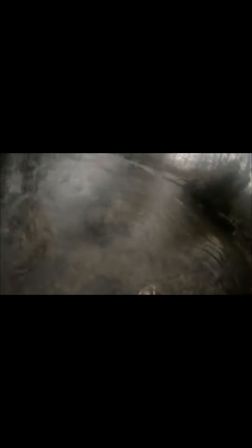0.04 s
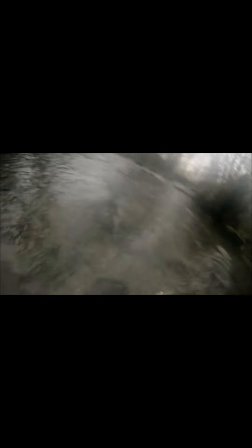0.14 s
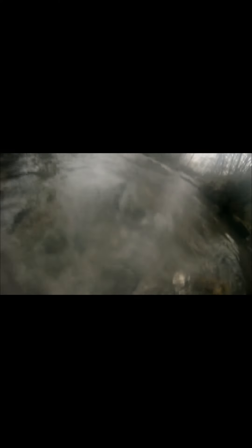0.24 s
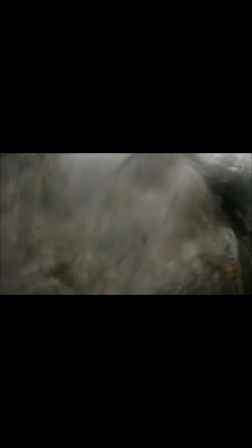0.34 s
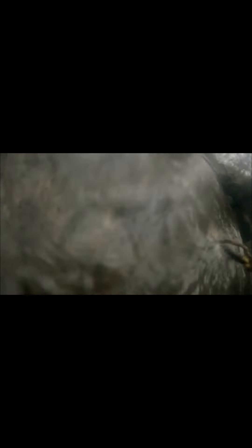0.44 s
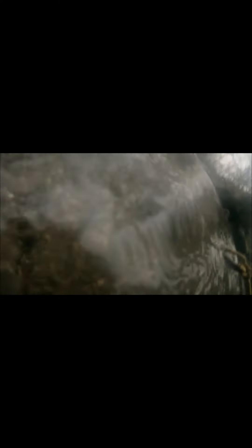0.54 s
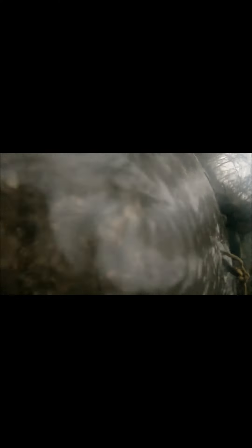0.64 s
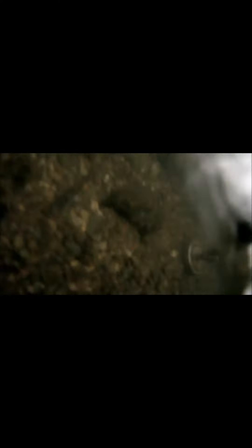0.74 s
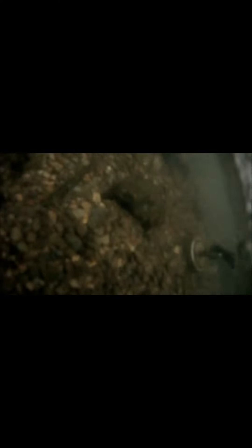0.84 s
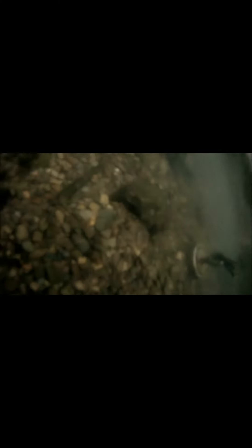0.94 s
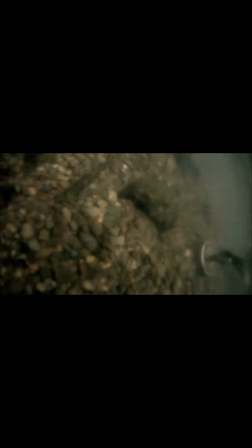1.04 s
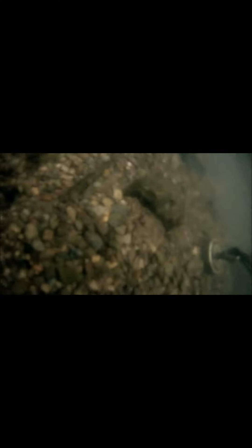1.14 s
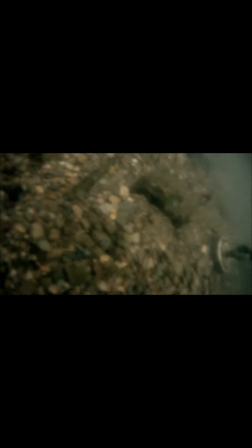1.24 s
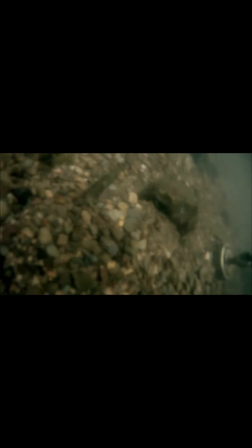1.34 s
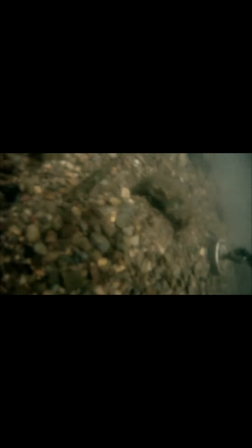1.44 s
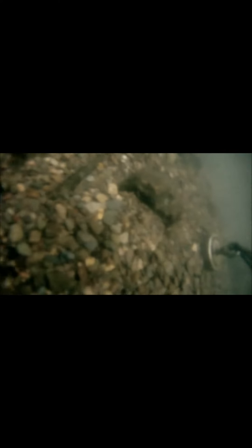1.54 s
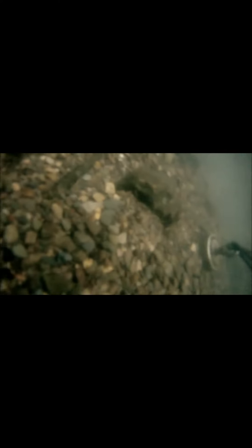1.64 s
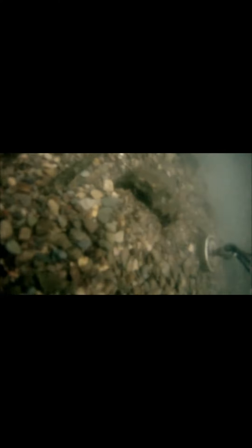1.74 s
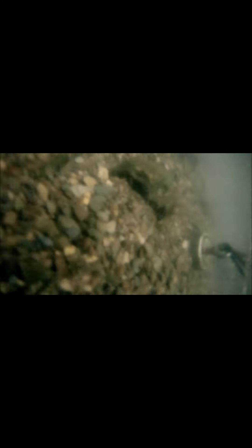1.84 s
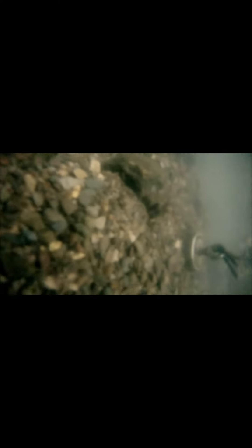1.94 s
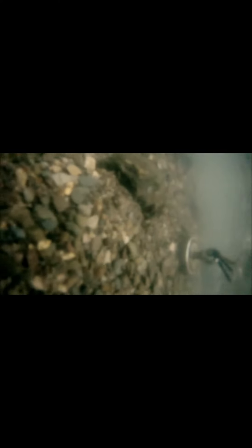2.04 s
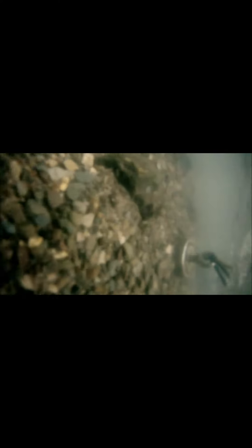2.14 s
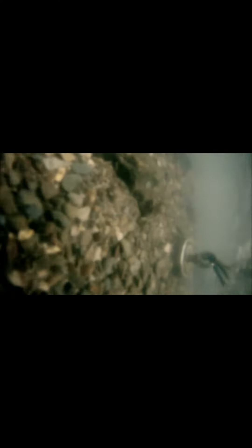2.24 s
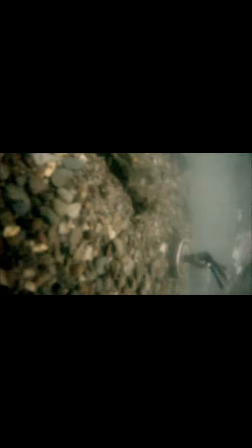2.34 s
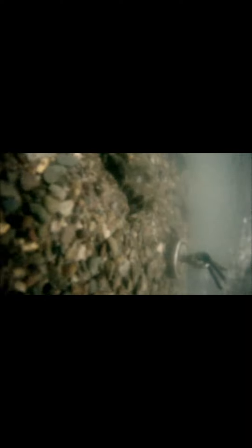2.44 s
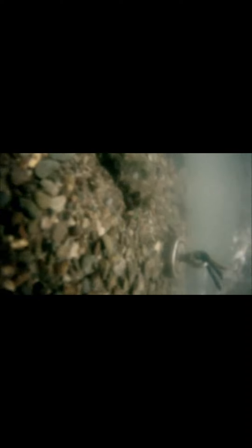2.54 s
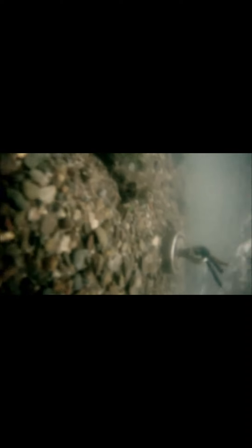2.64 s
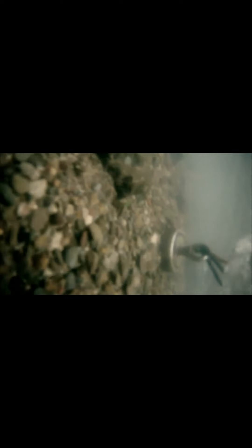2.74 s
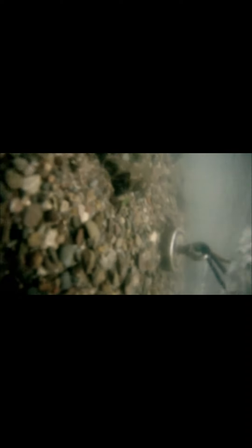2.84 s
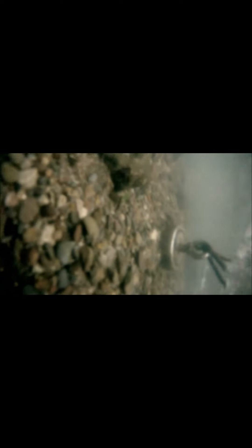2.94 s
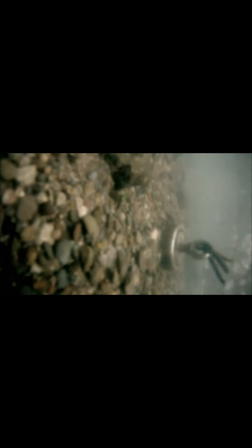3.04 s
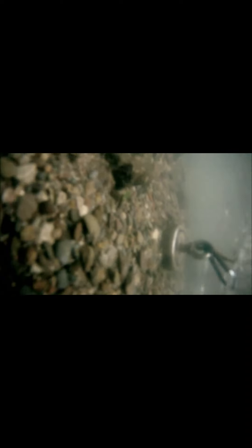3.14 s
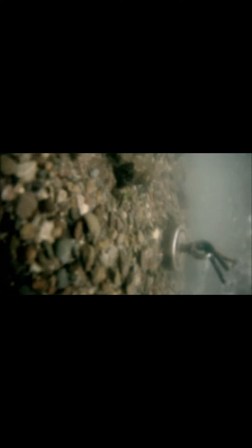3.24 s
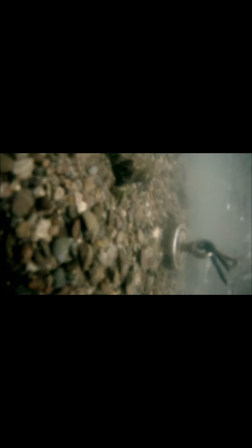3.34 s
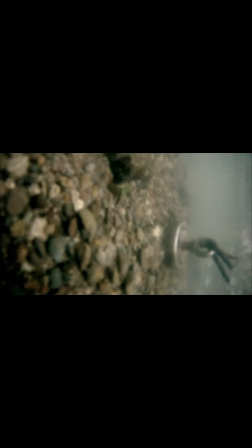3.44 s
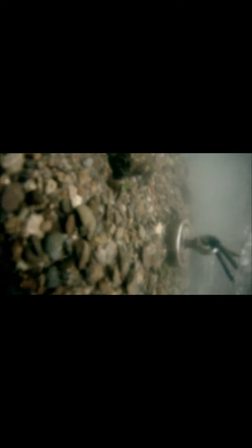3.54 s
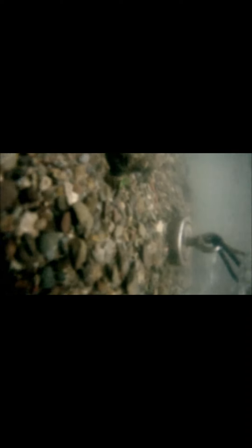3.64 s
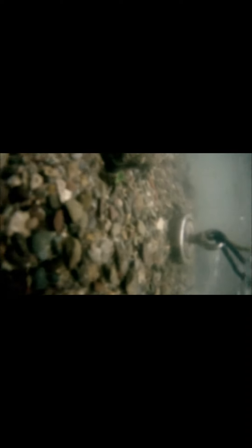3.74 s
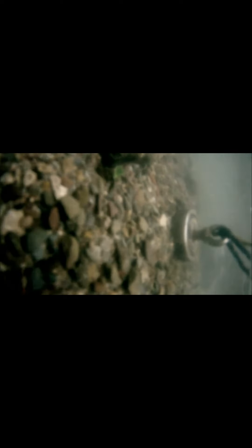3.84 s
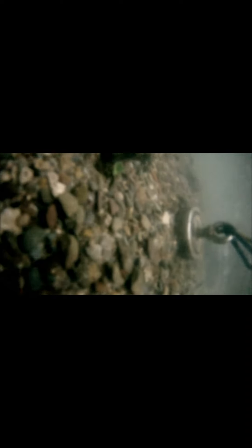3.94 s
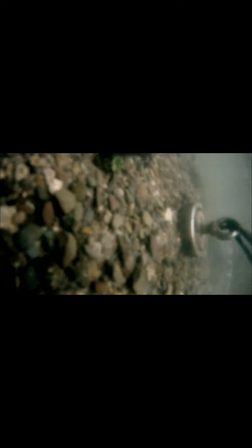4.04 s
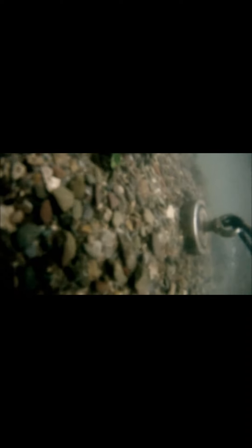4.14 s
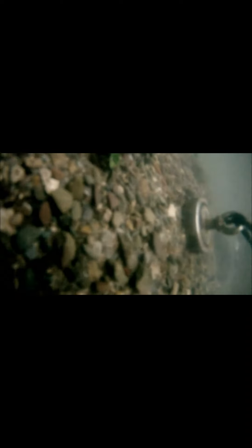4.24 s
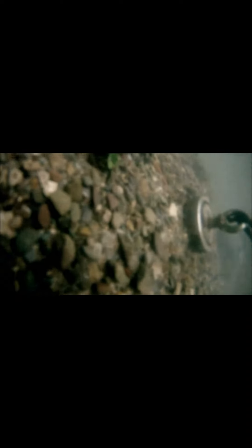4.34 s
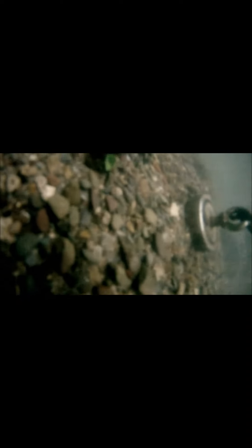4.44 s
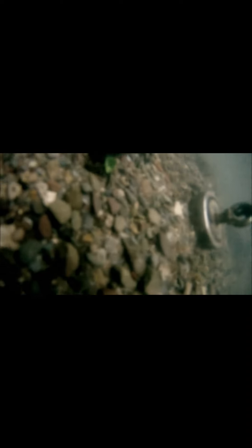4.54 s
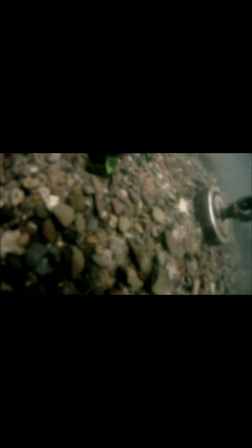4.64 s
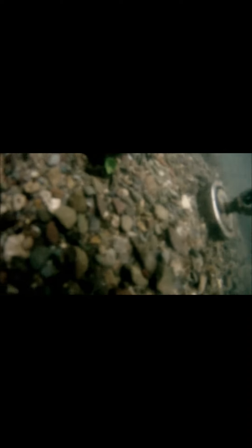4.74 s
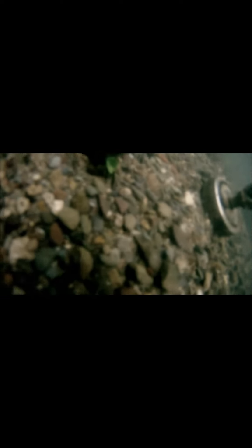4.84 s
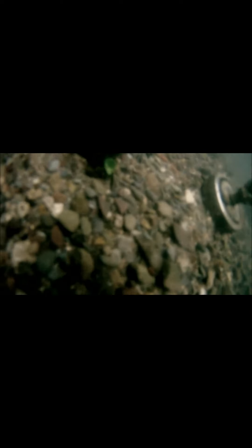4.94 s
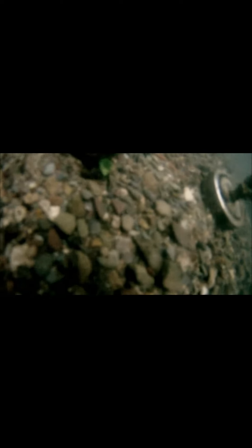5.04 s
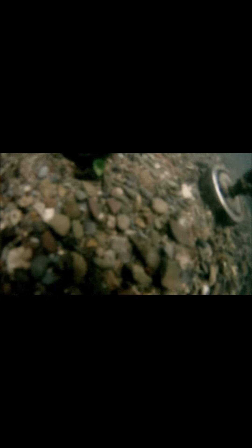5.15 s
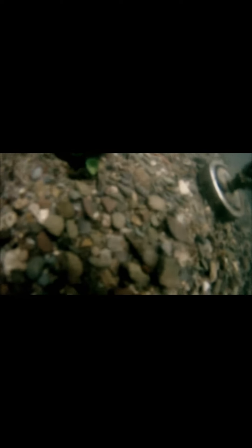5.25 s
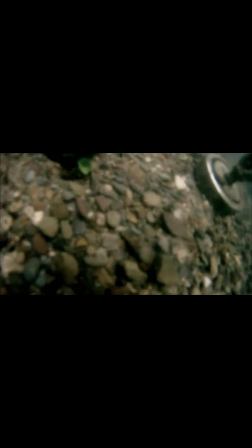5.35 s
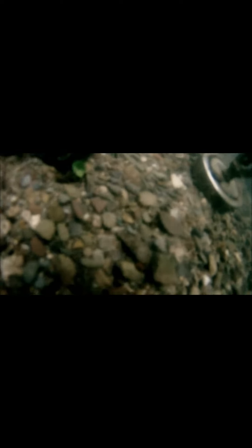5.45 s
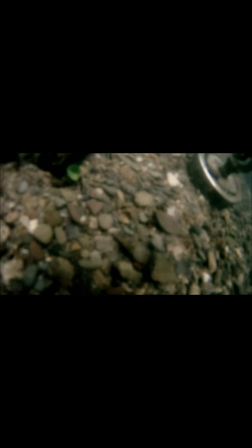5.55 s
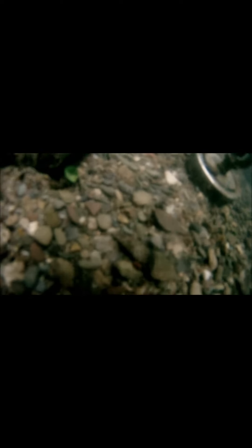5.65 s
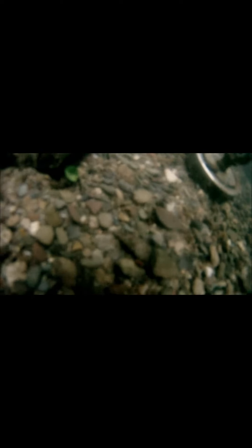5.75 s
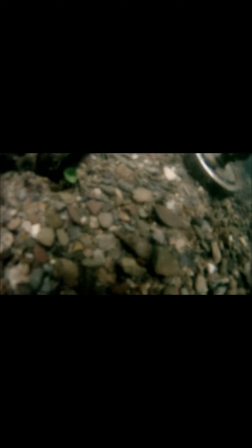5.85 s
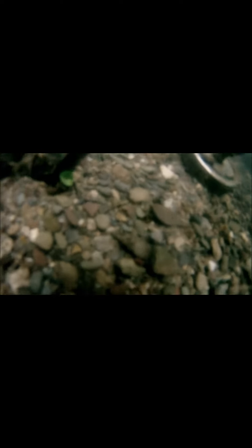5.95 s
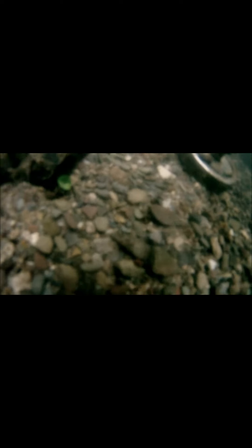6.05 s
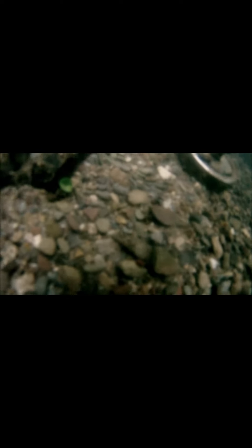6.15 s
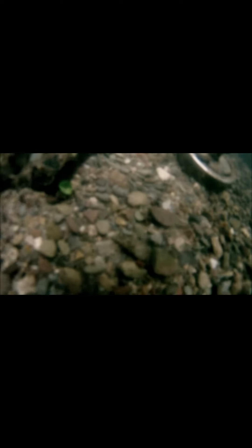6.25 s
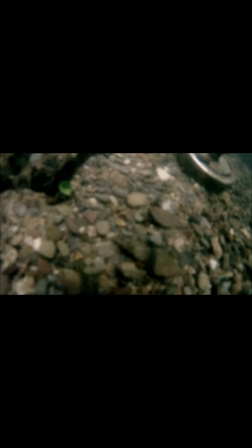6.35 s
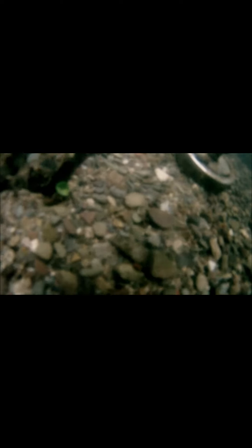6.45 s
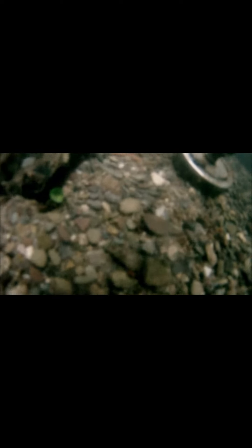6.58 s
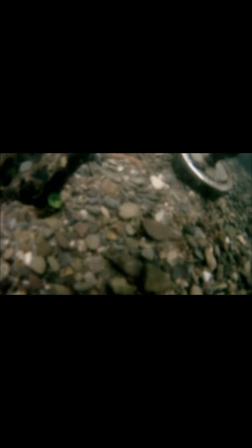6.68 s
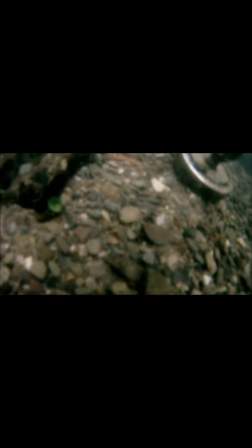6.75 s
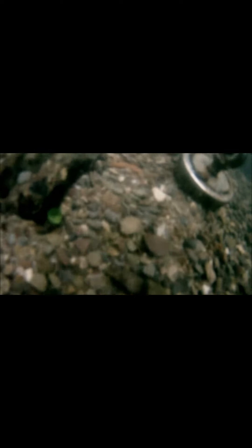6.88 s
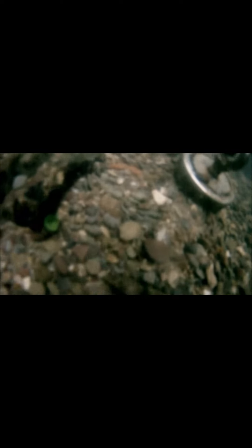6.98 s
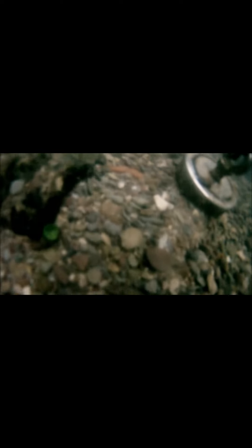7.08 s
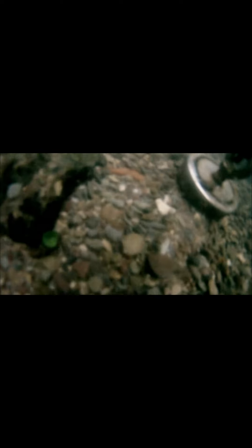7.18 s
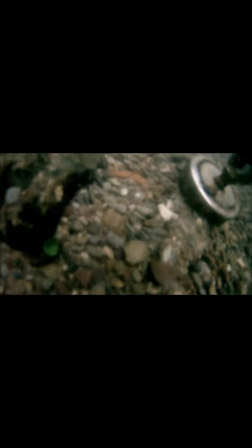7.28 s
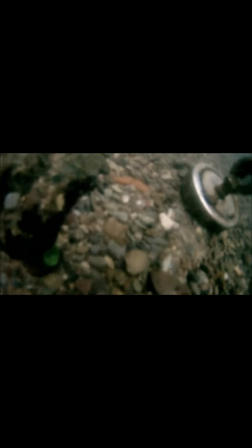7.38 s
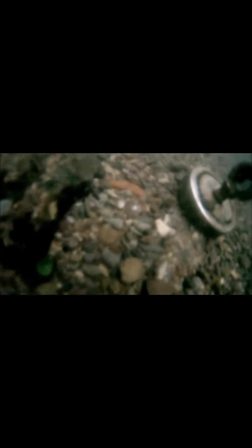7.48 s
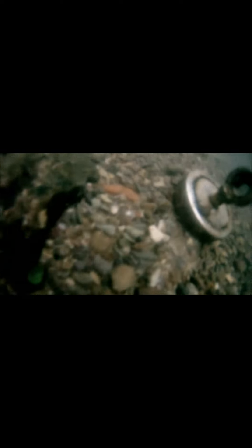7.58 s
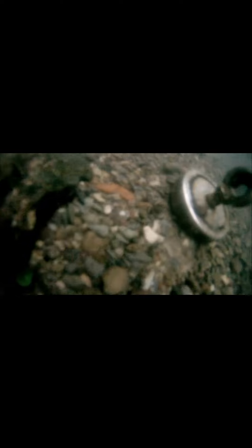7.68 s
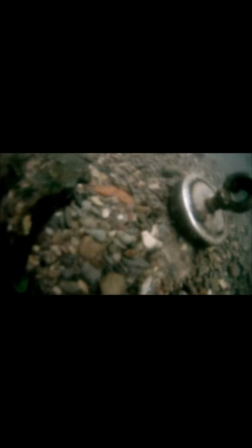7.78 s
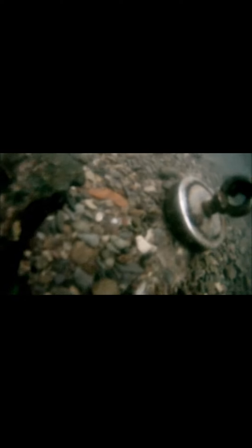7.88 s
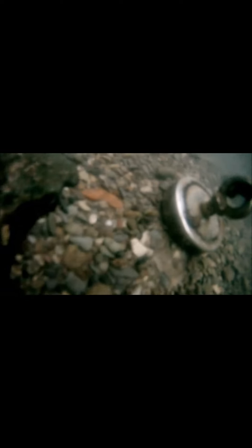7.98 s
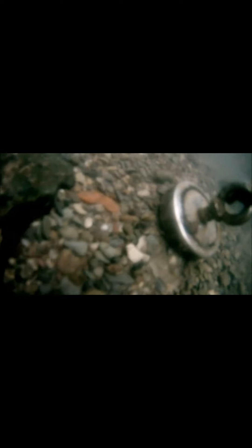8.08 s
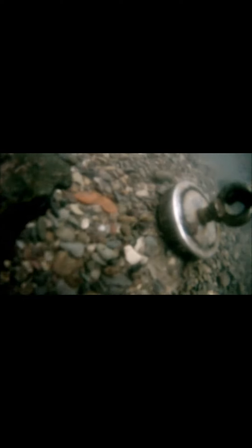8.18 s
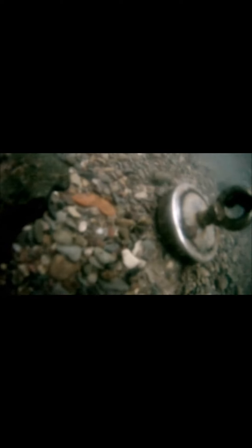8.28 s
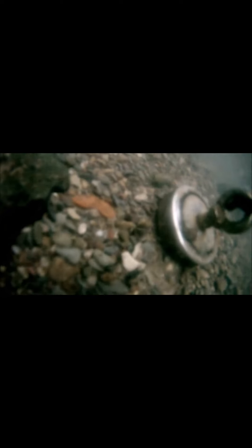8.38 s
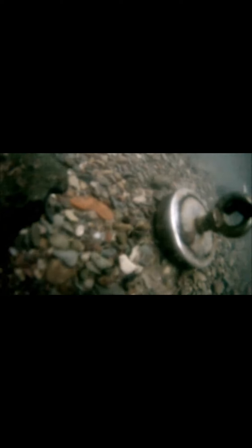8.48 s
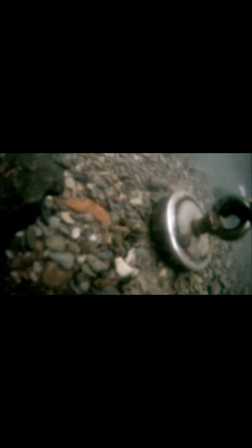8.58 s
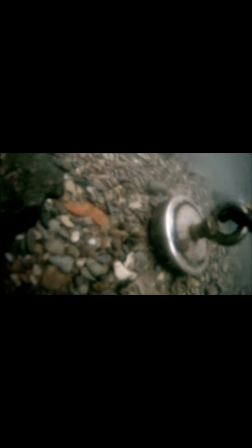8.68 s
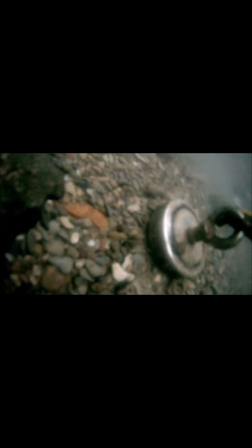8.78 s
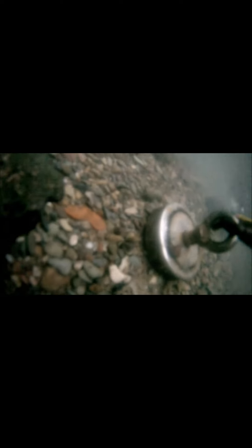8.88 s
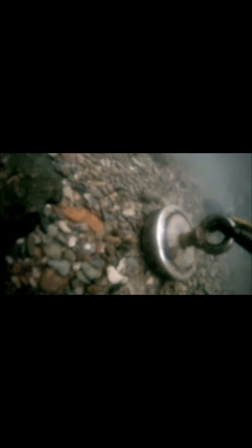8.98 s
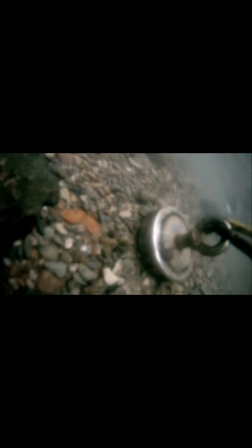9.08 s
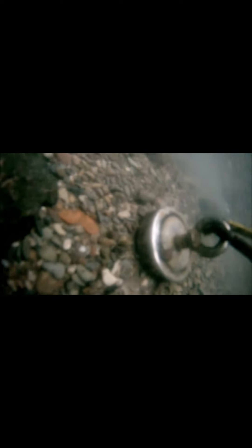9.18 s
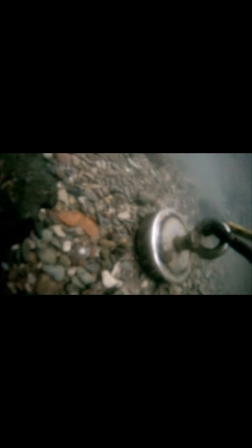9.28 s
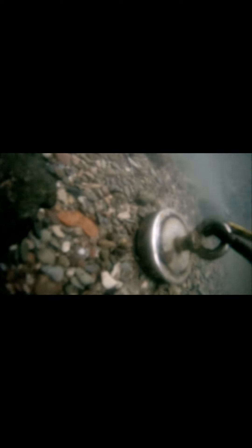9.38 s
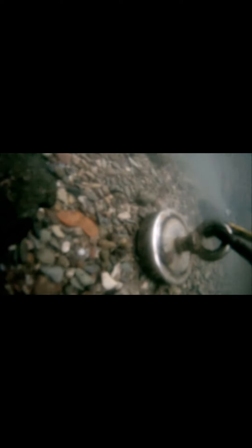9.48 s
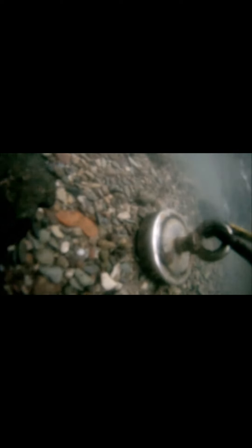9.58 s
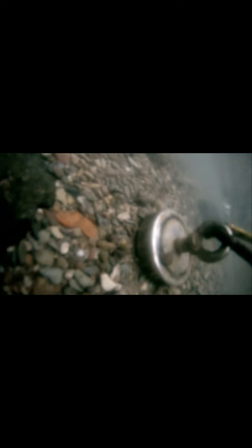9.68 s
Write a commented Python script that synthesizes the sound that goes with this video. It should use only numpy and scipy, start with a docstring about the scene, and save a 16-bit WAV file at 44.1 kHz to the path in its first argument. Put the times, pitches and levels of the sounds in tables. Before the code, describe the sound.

Heard from inside a sealed case: turbulent splashing and hollow plastic-like knocks, the hardest overloading, as it enters stream water over gravel. Bubbles pop and ring brightly with sagging pitch. The rush thins into dull underwater hush with a thin string of blips, then a brief, weak surge with one clear bubble near five seconds. Sparse pebble or magnet ticks and faint bubbles continue over a low rumble.

```python
"""Water rushes and slaps against a waterproof case, with a camera in it, as it dips into a shallow stream.
Magnet and pebbles click on it as hollow, decaying modes; then it is held under, over the gravel.
Bubbles ring as sagging sines, grit ticks, and filtered noise makes the rush, rumble, boom and far wash.
One microphone hears all of it through the case; a low sample rate, held, adds a glassy top."""
import sys
import numpy as np
from scipy import signal
from scipy.fft import rfft, irfft, next_fast_len
from scipy.io import wavfile
from scipy.ndimage import uniform_filter1d

SR = 44100
rng = np.random.default_rng(int(sys.argv[2]) if len(sys.argv) > 2 else 0)


def int16_out(signal):
    """Quantize to a 16-bit WAV file."""
    q = np.round(np.clip(np.atleast_2d(signal).T, -1, 1) * 32767)
    wavfile.write(sys.argv[1], SR, q.astype(np.int16))


N = 428652  # length in samples

# how deep the case sits; deeper water loads its walls more: start_s, depth (0-1)
DEPTH = [(0, 0), (1.5, .1), (2.4, .3), (4.9, .8), (6.3, .85), (7.2, 1)]

# spectrum of the far stream: freq_hz, density_db
STREAM_COLOUR = [(150, -38.5), (250, -7), (264, -5.5), (440, -6.5), (543, -9.5), (932, -6.5), (1090, -13.5),
                 (1210, -7), (1540, -7), (2220, -2), (2930, -15), (3340, -9), (3860, -16.5), (5090, -17.5),
                 (5800, -20.5), (7540, -57), (12800, -120)]

# spectrum of the deep rumble: freq_hz, density_db
RUMBLE_COLOUR = [(8.8, -30), (15, -1), (27, -1.5), (40, -2.5), (52, -4.5), (76, -11.5), (136, -15.5),
                 (220, -25.5), (290, -57.5), (480, -120)]
# rumble of the current between surges, before its gain and eddies: start_s, level_db
RUMBLE_LEVEL = [(0, -45.5), (0.5, -46.5), (1.05, -50), (1.35, -50.5), (1.5, -59), (1.9, -53), (2.1, -58.5),
                (2.7, -56), (3.3, -58), (4.0, -56), (4.5, -56.5), (4.8, -60), (6.3, -58.5), (6.7, -64),
                (7.3, -59.5), (8.5, -58.5), (9.72, -61.5)]
# boom of the current between surges, before its trim and eddies: start_s, level_db
BOOM_LEVEL = [(2.5, -71), (3.0, -69), (3.45, -77.5), (4.3, -68.5), (5.0, -68), (6.3, -63), (6.9, -74.5),
              (7.35, -61.5), (7.9, -64.5), (8.35, -60), (8.8, -63.5), (9.1, -70), (9.55, -64.5)]
RUMBLE_GAIN_DB, BOOM_TRIM_DB = 0.5, -2.0
EDDY_DB = 2  # spread of the slow swelling and easing
SURGE_RUMBLE_DB = -4.5  # rumble of a surge against its boom, before the boom's trim

# case resonances, lowered by the water's load: surface_hz, under_water_hz, width_hz
BOOM_MODE = (216, 174, 70)
WALL_MODE = (1125, 925, 72)

# surges of water over the case; boom before its trim: start_s, length_s, rush_db, boom_db
SURGES = [(0.0, 0.028, -28, -42.5), (0.069, 0.088, -34.5, -41), (0.165, 0.027, -26.5, -38),
          (0.207, .07, -38.5, -54), (0.298, 0.026, -29.5, -39.5), (0.374, 0.086, -28, -35.5),
          (0.486, 0.098, -31.5, -42.5), (0.616, 0.18, -37.5, -48), (0.778, 0.042, -29.5, -45.5),
          (0.908, 0.14, -44, -53), (1.021, 0.075, -41.5, -51), (1.147, 0.062, -44, -48),
          (1.306, 0.069, -35, -44), (1.432, 0.16, -41.5, -58), (1.52, 0.11, -31.5, -50.5),
          (1.64, 0.032, -40, -52), (1.775, 0.09, -46.5, -49), (1.849, 0.085, -33.5, -43),
          (1.942, .29, -45, -53), (2.253, 0.17, -51, -57), (4.976, 0.16, -48.5, -61.5),
          (5.18, 0.042, -47.5, -64), (5.279, 0.056, -46, -61.5), (5.344, 0.1, -50.5, -59),
          (5.512, 0.1, -46, -60.5), (5.657, 0.063, -45.5, -58), (5.745, 0.032, -47, -55.5),
          (5.85, 0.21, -49, -58.5), (6.132, 0.044, -52.5, -58.5), (6.21, 0.068, -50, -54)]
SURGE_ATTACK_S, RUSH_T60_S, BOOM_T60_S = 0.027, 0.096, 0.13

# strings of like bubbles: start_s, end_s, gap_s, pitch_hz, first_db, last_db
TRICKLES = [(2.76, 4.5, .1, 2187, -44.5, -56), (6.898, 9.5, .21, 2303, -47.5, -52)]
TRICKLE_PITCH_SPREAD = 0.022  # as a share of the pitch
TRICKLE_SPREAD_DB = 2
TRICKLE_JITTER = 0.15  # as a share of the gap

# single bubbles, most of them loud: start_s, pitch_hz, level_db
BUBBLES = [(0.802, 1710, -12.5), (0.809, 1535, -13.5), (0.822, 3480, -11.5), (0.867, 1600, -18.5),
           (0.873, 3330, -24.5), (0.874, 557, -38), (1.3715, 2456, -14.5), (1.374, 1103, -25),
           (1.468, 940, -27), (1.493, 886, -26), (1.963, 823, -27), (2.386, 3460, -27), (2.397, 905, -26.5),
           (2.407, 2150, -28.5), (2.433, 3500, -37), (2.456, 766, -39), (2.48, 1090, -38.5),
           (2.537, 1116, -33), (2.544, 2090, -31.5), (2.634, 2080, -40.5), (2.694, 2110, -37),
           (2.875, 2190, -42.5), (2.962, 1560, -45), (3.192, 2000, -43), (5.113, 1980, -23),
           (6.087, 980, -42), (6.402, 2040, -43), (7.063, 2190, -42.5), (8.133, 2166, -28),
           (8.837, 2267, -42.5), (9.174, 910, -49)]

# what the case rings with after a knock: freq_hz, level_db, t60_s
CASE_MODES = [(785, -16.5, 0.043), (970, -13, .04), (1226, 2.5, 0.042), (1400, -7.5, 0.036),
              (1753, 3.5, .041), (2087, -6, .016)]
# its high, short-lived modes: freq_hz, level_db, t60_s
CRACK_MODES = [(3090, -4.5, 0.0071), (3520, -1, 0.012), (3930, -3.5, 0.0073), (4670, -7, 0.0048),
               (5380, -3, .006)]

GRIT_PER_S = 2
GRIT_DB, GRIT_SPREAD_DB = -68.5, 7  # base level of a tick, and how far above it others reach

# pockets of water thumping the case, before a doubling of gain: start_s, level_db
THUMPS = [(0.179, -29), (0.4813, -25), (0.513, -34.5), (0.5886, -28.5), (0.752, -39), (0.872, -43.5),
          (1.8516, -36.5), (2.5357, -44.5)]
THUMP_HZ, THUMP_T60_S, THUMP_SLOSH_DB = 136, 0.028, -8

# spectrum of the rush inside the case, dipping in and then under water: freq_hz, density_db
DIPPING_COLOUR = [(180, -49.5), (300, -17.5), (409, -24.5), (616, -22), (809, -18.5), (974, -12.5),
                  (1120, -9), (1280, -8.5), (1880, 0.5), (2070, -1.5), (2470, -12.5), (3580, -15),
                  (4420, -28.5), (5060, -22.5), (5800, -33.5), (7540, -62), (12800, -120)]
UNDER_COLOUR = [(180, -42.5), (300, -16.5), (457, -21.5), (511, -16.5), (760, -27), (950, -8.5),
                (1090, -16), (1340, -1.5), (1480, -5), (1970, 0), (2900, -18), (3580, -15), (4580, -29.5),
                (5060, -22), (5800, -37), (7540, -66.5), (12800, -120)]
# the even flow between surges: start_s, level_db
FLOW_LEVEL = [(0, -46), (0.7, -50), (1.25, -52), (2.3, -57), (2.7, -85), (4.5, -75.5), (4.95, -55.5),
              (5.25, -59), (6.2, -61.5), (6.55, -76.5)]

# slaps of water and clicks of magnet and pebbles: start_s, level_db, pitch_hz, crack_db
KNOCKS = [(0.1785, -12.5, 1800, -25.5), (0.1805, -13.5, 1720, -47), (0.1852, -19, 1580, -26),
          (0.1918, -1.5, 1855, -20.5), (0.3389, -29.5, 1840, -39), (0.3697, -25, 1770, -39),
          (0.4815, -10, 1770, -32), (0.4847, -15, 1950, -39), (0.566, -24, 1880, -62),
          (0.5887, -18, 1640, -59), (0.753, -31, 1890, -35), (0.8198, -29, 1640, -36),
          (0.8633, -35, 1970, -45), (0.903, -32, 2040, -42), (0.911, -36, 1540, -31.5),
          (0.9406, -43, 1710, -50), (1.467, -32, 2180, -37), (1.4916, -22, 2170, -27.5),
          (1.5977, -20, 1960, -37), (1.7104, -30.5, 1970, -68), (1.8504, -26.5, 1990, -52),
          (2.3185, -15, 1560, -60), (2.355, -38, 2070, -37), (2.3861, -34.5, 2260, -35),
          (2.3963, -29.5, 920, -35.5), (2.424, -48, 2000, -49), (2.4536, -49, 1740, -48),
          (2.4762, -28.5, 2070, -28), (2.5356, -42, 1620, -41), (2.929, -55, 1703, -68),
          (2.9558, -44, 1906, -46), (3.1231, -58.5, 2200, -56), (3.185, -38, 1870, -41.5),
          (3.235, -59, 1990, -60), (4.396, -64, 2250, -57.5), (5.1111, -35.5, 2300, -49.5),
          (6.083, -29.5, 2090, -68), (7.209, -51, 1910, -63), (8.231, -58.5, 1213, -63.5),
          (8.678, -53, 1900, -67.5), (8.9037, -58.5, 1680, -74), (9.11, -57, 1820, -69.5)]
# heavy, low-pitched contacts ring the case more than light ones: pitch_hz, ring_db (against the knock)
RING_BY_PITCH = [(950, -8.5), (1570, -5), (1800, -18), (2150, -22)]
THUD_DB, THUD_LOSS_DB = -25.5, 14  # thud against the knock at the surface, and its loss at full depth

CLIP_LEVEL = 0.64  # ceiling of the overloaded input
HOLD_HZ, TOP_HZ = 12000, 15400  # rate of the held samples, and the final treble limit


def undb(db):
    """Decibels to gain."""
    return 10 ** (np.asarray(db) / 20)


def unit(x):
    """Scale to rms 1."""
    return x / np.sqrt(np.mean(x ** 2) + 1e-20)


def curve(table):
    """Each column of a table of (start_s, ..) rows, drawn as a line through every sample."""
    s, *columns = np.transpose(table)
    return [np.interp(np.arange(N) / SR, s, c) for c in columns]


def colour(x, points):
    """Filter by a spectrum of (freq_hz, density_db) points, silent outside them."""
    hz, db = np.transpose(points)
    size = next_fast_len(N, True)
    f = np.maximum(np.arange(size // 2 + 1) * SR / size, 1)
    gain = undb(np.interp(np.log(f), np.log(hz), db)) * (f > hz[0]) * (f < hz[-1])
    return irfft(rfft(x, size) * gain, size)[:N]


def resonate(x, hz, width_hz):
    """One resonance, gain 1 at its centre."""
    return signal.lfilter(*signal.iirpeak(hz, hz / width_hz, fs=SR), x)


def cut(x, hz, kind, order=2):
    """A low-, high- or band-pass."""
    return signal.sosfilt(signal.butter(order, hz, kind, fs=SR, output="sos"), x)


def walk(rate):
    """Random levels, held 1 / rate s and smoothed twice, scaled to rms 1."""
    k = max(int(SR / rate), 1)
    steps = np.repeat(rng.standard_normal(N // k + 1), k)
    smooth = uniform_filter1d(uniform_filter1d(steps, k), k)
    return unit(smooth[:N])


def fade(t, t60):
    """Exponential decay, 60 dB down after t60."""
    return np.exp(-np.log(1000) * t / max(t60, 1e-4))


def add(out, s, sound):
    """Mix a sound in at time s."""
    i = int(np.clip(s * SR, 0, N - 1))
    out[i:i + len(sound)] += sound[:N - i]


def crackle(rate, spread_db):
    """Impulses of either sign at random moments; a wider spread makes a few stand out."""
    size = undb(spread_db * np.minimum(rng.exponential(size=N), 4))
    struck = rng.random(N) < rate / SR
    return unit(struck * size * rng.choice([-1, 1], N))


def bubble(hz, cycles, sag):
    """A pocket of air swells into ringing and fades over some cycles while its pitch sags."""
    life = cycles / hz
    t = np.arange(int(life * SR)) / SR
    pitch = hz * (1 + sag * (1 / 4 - t / life))
    swell = 1 - np.exp(-t * hz / 2.5)
    return np.sin(2 * np.pi * np.cumsum(pitch) / SR) * fade(t, life) * swell


def loaded(mode, depth):
    """A resonance of the case, stirred at random by the water and sinking in pitch with depth."""
    surface_hz, under_hz, width_hz = mode
    noise = rng.standard_normal(N) + 1j * rng.standard_normal(N)
    stir = cut(noise, width_hz / 2, "lowpass", order=3)
    hz = surface_hz + (under_hz - surface_hz) * depth
    return unit(np.real(stir * np.exp(2j * np.pi * np.cumsum(hz) / SR)))


def surging(levels_db, t60):
    """Gain of all surges together: each swells, holds and drains away; their powers add."""
    t = np.arange(N) / SR
    starts, lengths, *_ = np.transpose(SURGES)
    power = np.zeros(N)
    for s, length, db in zip(starts, lengths, levels_db):
        swell = np.clip((t - s) / SURGE_ATTACK_S + 0.5, 0, 1)
        drain = fade(np.clip(t - s - length, 0, 1), t60)
        power += (undb(db) * swell * drain) ** 2
    return np.sqrt(power)


def churn(x, flicker_db):
    """Eddies of every size come and go: each half-octave swells and ducks on its own."""
    centres = 400 * 2 ** (np.arange(9) / 2)
    size = next_fast_len(N, True)
    octave = np.log2(np.maximum(np.arange(size // 2 + 1) * SR / size, 1))
    spectrum = rfft(x, size)
    out = np.zeros(N)
    for one in np.eye(len(centres)):
        share = np.interp(octave, np.log2(centres), one)
        band = irfft(spectrum * share, size)[:N]
        out += band * undb(flicker_db * walk(55))
    return unit(out)


def stream():
    """The far wash of the stream, with faintly ticking sand and a simmer of tiny bubbles."""
    wash = unit(colour(rng.standard_normal(N), STREAM_COLOUR)) * undb(-63.88 + 0.44 * walk(20))
    sand = unit(cut(crackle(rate=22, spread_db=1.0), [3000, 5200], "bandpass"))
    simmer = np.zeros(N)
    for when, pitch, size in rng.random((380, 3)):
        # most bubbles are near one size; the few smaller ones ring higher and fainter
        smallness = pitch ** 4
        blip = bubble(2080 + 1400 * smallness, cycles=44, sag=0.055)
        add(simmer, when * N / SR, undb(-57.5 + 11 * size ** 2 - 6 * smallness) * blip)
    return wash + undb(-80.5) * sand + simmer


def current(depth):
    """Eddies buffet the case: a deep rumble and a hollow, gurgling boom, both rising with each surge."""
    rumble_db, = curve(RUMBLE_LEVEL)
    boom_db, = curve(BOOM_LEVEL)
    eddies_db = EDDY_DB * walk(12)
    _, _, _, surge_boom_db = np.transpose(SURGES)
    surges = surging(surge_boom_db, BOOM_T60_S)

    rumble = unit(colour(rng.standard_normal(N), RUMBLE_COLOUR))
    steady_rumble = undb(rumble_db + RUMBLE_GAIN_DB + 0.6 * eddies_db)
    rumble = rumble * np.hypot(steady_rumble, undb(SURGE_RUMBLE_DB) * surges)

    gurgle = unit(cut(rng.standard_normal(N), [95, 215], "bandpass", order=4))
    boom = loaded(BOOM_MODE, depth) + undb(-8) * gurgle
    boom_gain = np.hypot(undb(boom_db + eddies_db), surges)
    return rumble + boom * boom_gain * undb(1.8 * walk(25) + BOOM_TRIM_DB)


def grit():
    """Now and then a grain of gravel ticks the high modes of the case, each by a random share."""
    out = np.zeros(N)
    t = np.arange(int(0.02 * SR)) / SR
    count = int(GRIT_PER_S * N / SR)
    for when, size, *shares in rng.random((count, 2 + len(CRACK_MODES))):
        tick = np.zeros(len(t))
        for share, (hz, db, t60) in zip(shares, CRACK_MODES):
            tick += share * undb(db) * fade(t, t60) * np.sin(2 * np.pi * hz * t)
        add(out, when * N / SR, undb(GRIT_DB + GRIT_SPREAD_DB * size) * tick)
    return out


def trickles():
    """Bubbles of nearly one size break loose one by one, unevenly spaced and tending to grow fainter."""
    out = np.zeros(N)
    for start, end, gap, hz, first_db, last_db in TRICKLES:
        for s in np.arange(start, end, gap):
            late, pitch, size = rng.standard_normal(3)
            db = np.interp(s, [start, end], [first_db, last_db]) + TRICKLE_SPREAD_DB * size
            blip = bubble(hz * np.exp(TRICKLE_PITCH_SPREAD * pitch), cycles=76, sag=0.14)
            add(out, s + TRICKLE_JITTER * gap * late, undb(db) * blip)
    return out


def bubbles():
    """Single bubbles break loose close to the case; higher ones ring for more cycles."""
    out = np.zeros(N)
    for s, hz, db in BUBBLES:
        add(out, s, undb(db) * bubble(hz, cycles=58 * (hz / 2000) ** 0.63, sag=0.14))
    return out


def thumps():
    """Each pocket of water gives a few low cycles and a dull slosh."""
    out = np.zeros(N)
    t = np.arange(int(0.08 * SR)) / SR
    for s, db in THUMPS:
        slosh = unit(cut(rng.standard_normal(len(t)), 380, "lowpass"))
        push = np.sin(2 * np.pi * THUMP_HZ * t) + undb(THUMP_SLOSH_DB) * slosh
        add(out, s, 2 * undb(db) * cut(push * fade(t, THUMP_T60_S), 550, "lowpass"))
    return out


def rush(depth):
    """Turbulence, spray and bursting foam drum on the case, in uneven surges."""
    drive = rng.standard_normal(N) + crackle(rate=1700, spread_db=0)
    # share of the case that is covered; spray stops once it is under
    under = np.clip(2 * depth - 0.5, 0, 1)
    dipping = unit(colour(drive, DIPPING_COLOUR))
    covered = unit(colour(drive, UNDER_COLOUR))
    body = (1 - under) * dipping + under * covered
    drumming = churn(body, flicker_db=1.5) + undb(-15) * loaded(WALL_MODE, depth)

    drops = resonate(resonate(crackle(rate=210, spread_db=3.5), 3200, 500), 3520, 800)
    spray = unit(drops) * undb(3 * walk(7.4))
    foam = np.zeros(N)
    for when, pitch, size in rng.random((1500, 3)):
        blip = bubble(1200 + 1250 * pitch, cycles=25, sag=0.079)
        add(foam, when * N / SR, undb(14 * size ** 2) * blip)
    sound = drumming + undb(-18) * (1 - under) * spray + undb(-9.5) * unit(foam)

    flow_db, = curve(FLOW_LEVEL)
    _, _, surge_rush_db, _ = np.transpose(SURGES)
    level = np.hypot(undb(flow_db), surging(surge_rush_db, RUSH_T60_S))
    return unit(sound) * level * undb(2.1 * walk(90))


def strength(x):
    """Scale a knock to rms 1 over its first 6 ms."""
    head = int(0.006 * SR)
    return x / np.sqrt(np.mean(x[:head] ** 2))


def wall(x):
    """The stiff wall passes little below or above its modes."""
    return strength(cut(cut(x, 700, "highpass", order=4), 3000, "lowpass", order=3))


def knocks():
    """Each knock gives a short hollow pock, rings the case, cracks on top and thuds below."""
    out = np.zeros(N)
    t = np.arange(int(0.08 * SR)) / SR
    onset = 1 - np.exp(-t / 0.0006)  # water cushions the contact
    for s, db, hz, crack_db in KNOCKS:
        ring_db = db + np.interp(hz, *np.transpose(RING_BY_PITCH))
        depth = np.interp(s, *np.transpose(DEPTH))
        thud_db = db + THUD_DB - THUD_LOSS_DB * np.sqrt(depth)

        pock = strength(np.sin(2 * np.pi * hz * t) * fade(t, 0.0061) * onset)
        splash = strength(resonate(rng.standard_normal(len(t)) * fade(t, 0.009), hz, 900))
        body = wall(pock + undb(-10.5) * splash)

        ring = np.zeros(len(t))
        for mode_hz, mode_db, t60 in CASE_MODES:
            # modes near the pitch of the contact are driven hardest
            gain = undb(mode_db - 7 * np.log2(mode_hz / hz) ** 2)
            detuned_hz = mode_hz * (1 + 0.005 * rng.standard_normal())
            ring += gain * fade(t, t60) * np.sin(2 * np.pi * detuned_hz * t)

        crack = np.zeros(len(t))
        for mode_hz, mode_db, t60 in CRACK_MODES:
            # the sharp edge of the contact shakes the high modes differently each time
            gain = undb(mode_db + 3.5 * rng.standard_normal())
            detuned_hz = mode_hz * (1 + 0.02 * rng.standard_normal())
            crack += gain * fade(t, t60) * onset * np.sin(2 * np.pi * (detuned_hz * t + rng.random()))

        thud = strength(cut(np.sin(2 * np.pi * 140 * t) * fade(t, 0.026), 310, "lowpass"))
        add(out, s, undb(db) * body + undb(ring_db) * wall(ring))
        add(out, s, undb(crack_db) * strength(crack) + undb(thud_db) * thud)
    return out


def scene():
    """One microphone hears everything; both channels carry it."""
    depth, = curve(DEPTH)
    background = stream() + current(depth)
    details = grit() + trickles() + bubbles() + thumps()
    sound = background + details + rush(depth) + knocks()
    return np.array([sound, sound])


def record(dry):
    """The input overloads on the hardest slaps; each slow sample is held, mirroring sound into the treble."""
    narrow = signal.sosfilt(signal.butter(10, 5800, fs=SR, output="sos"), dry)
    slow = signal.resample_poly(narrow, HOLD_HZ, SR, axis=1, window=("kaiser", 8))
    loud = CLIP_LEVEL * slow / (CLIP_LEVEL ** 4 + slow ** 4) ** (1 / 4)
    steps = np.repeat(loud, 8, axis=1)  # the hold, drawn at 8 times the slow rate
    held = signal.resample_poly(steps, SR, 8 * HOLD_HZ, axis=1)[:, :N]
    return signal.sosfilt(signal.ellip(8, 0.2, 70, TOP_HZ, fs=SR, output="sos"), held)


dry = scene()
out = record(dry)
int16_out(out)
```